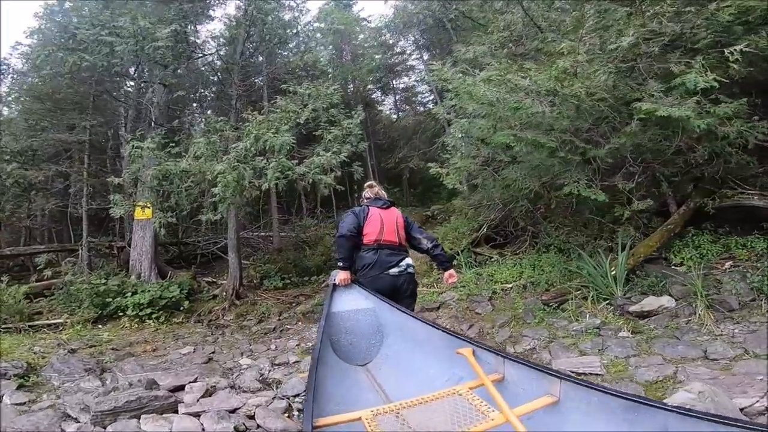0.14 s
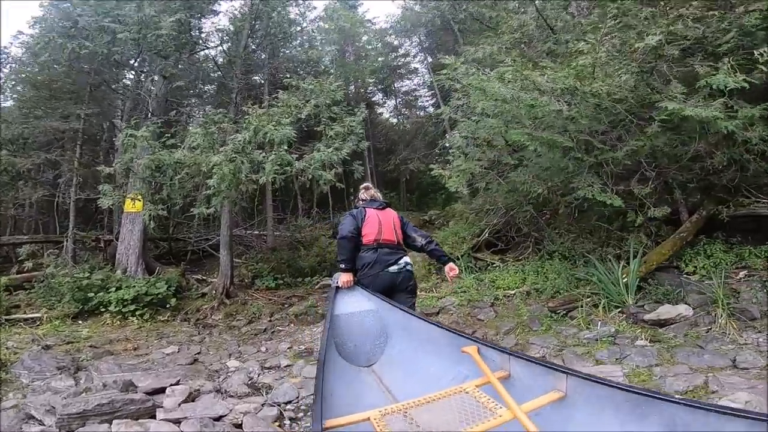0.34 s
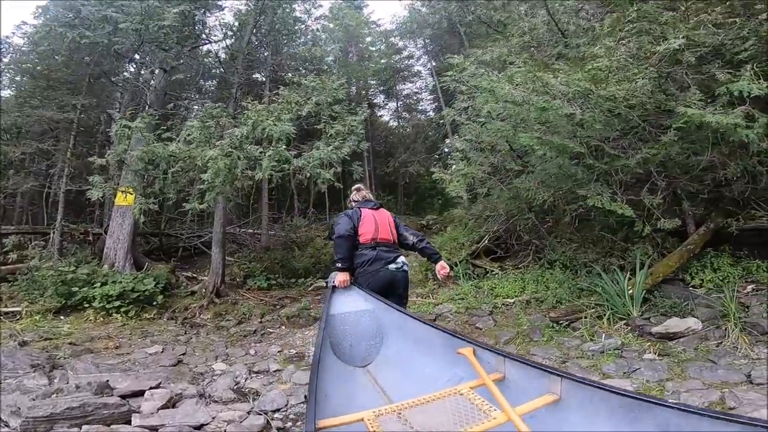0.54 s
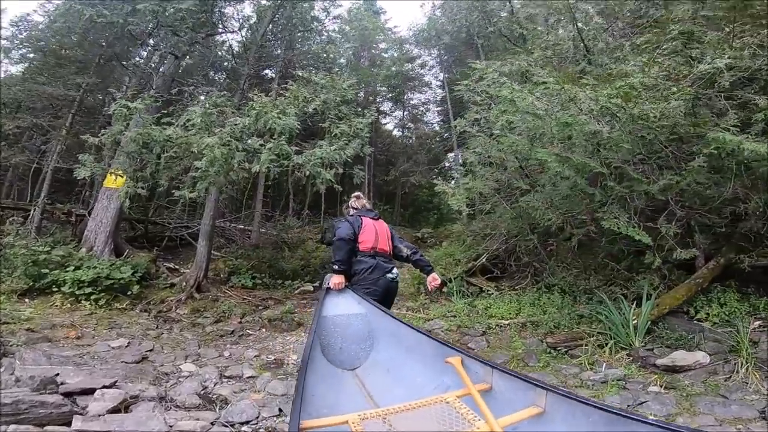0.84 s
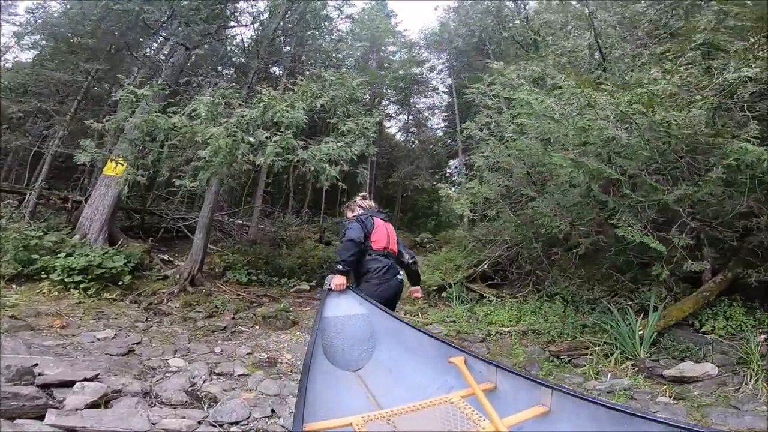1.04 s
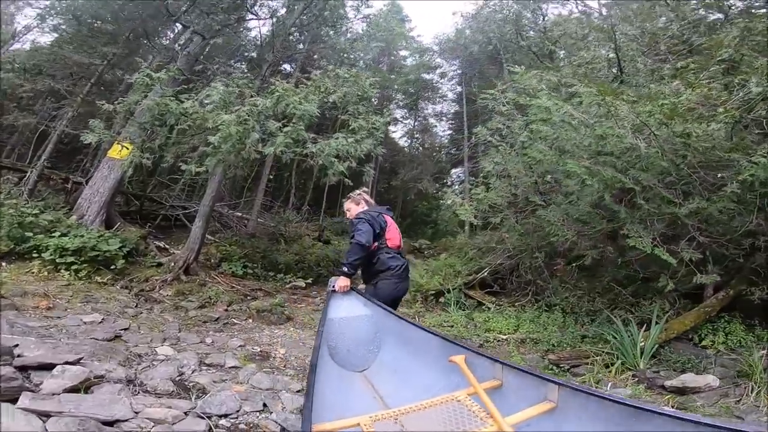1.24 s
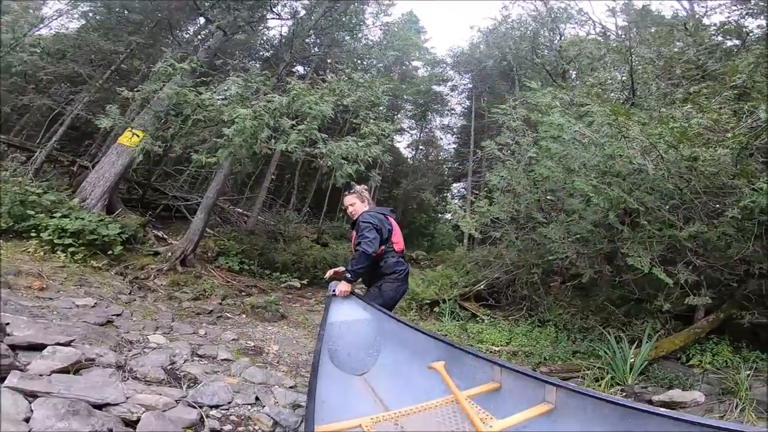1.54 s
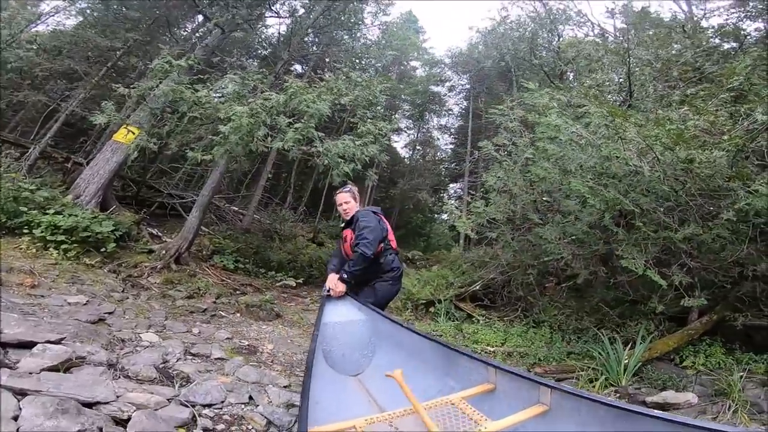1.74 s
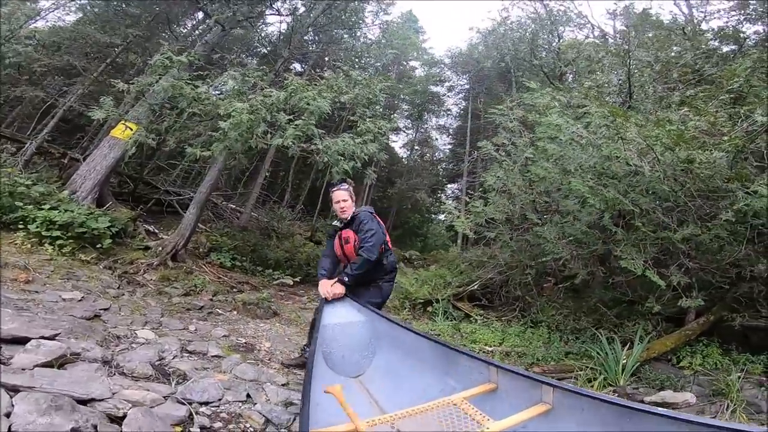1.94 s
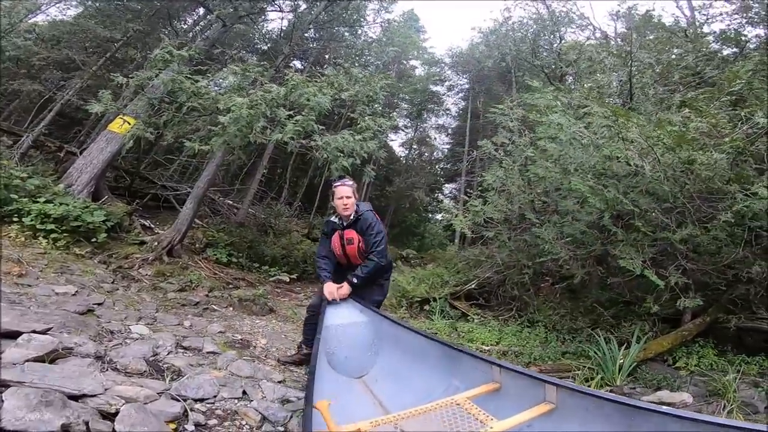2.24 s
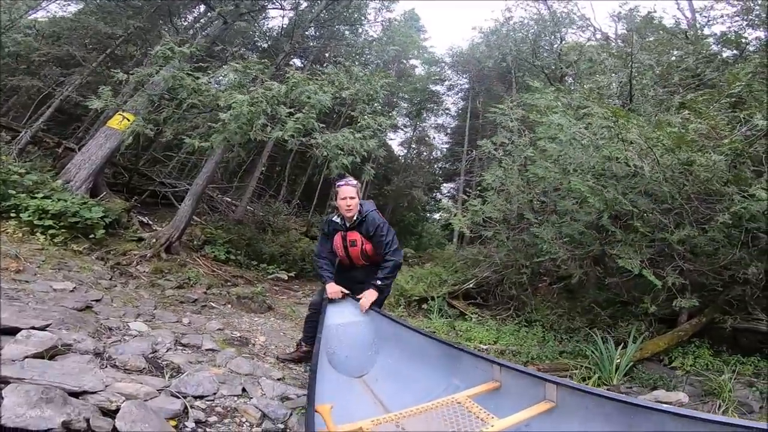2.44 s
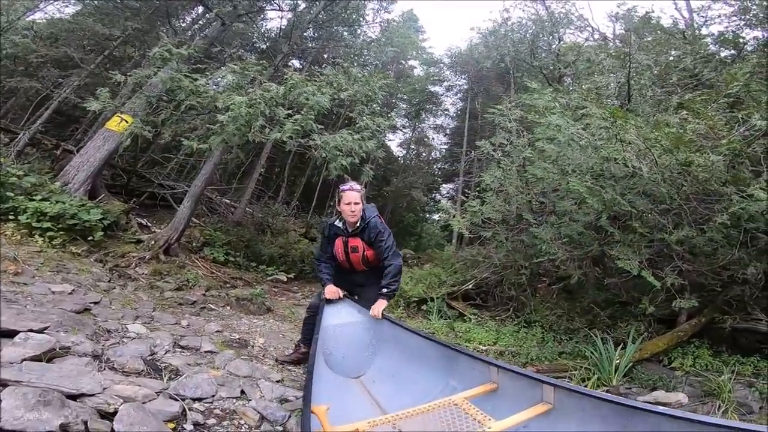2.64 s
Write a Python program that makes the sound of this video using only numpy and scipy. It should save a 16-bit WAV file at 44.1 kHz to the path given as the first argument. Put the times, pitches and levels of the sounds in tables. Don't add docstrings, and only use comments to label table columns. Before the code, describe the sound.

A canoe hull scrapes and knocks over stones as it is hauled up a rocky shore

```python
import sys
import numpy as np
from scipy import signal
from scipy.io import wavfile
from scipy.ndimage import uniform_filter1d

SR = 44100
rng = np.random.default_rng(int(sys.argv[2]) if len(sys.argv) > 2 else 0)


def gain_from_decibels(decibels):
    exponent = np.asarray(decibels, float) / 20
    return 10 ** exponent


def wav_out(sig):
    wavfile.write(sys.argv[1], SR, np.round(np.clip(np.atleast_2d(sig).T, -1, 1) * 32767).astype(np.int16))


N = 123479
T = np.arange(N) / SR

# start_s, rasp_db, weight_db (shaking the hull), fine_grit_db, keel_contact_db
PULL = [(0, -71.5, -51, 42, -4), (0.232, -44.5, -42, 17.5, 7), (0.25, -22, -33, 9.5, -14.5),
        (0.43, -25.5, -29, 9.5, 6.5), (0.596, -24.5, -27, 3, -1), (0.636, -29.5, -27, 8.5, -3),
        (0.901, -30.5, -34, 12.5, 2.5), (1.039, -36, -36, 14.5, 5), (1.099, -27, -35, 9.5, 4.5),
        (1.221, -31.5, -27.5, 10.5, 1), (1.451, -35, -23, 18.5, 1.5), (1.601, -40, -42, 22.5, 2.5),
        (1.702, -35, -30.5, 15.5, -0.5), (2.047, -37.5, -17.5, 20, -8.5), (2.3, -36, -28.5, 20, -14),
        (2.367, -33, -50, 25, -36), (2.429, -52.5, -19.5, 31, -10.5), (2.72, -65.5, -46.5, 32, -11.5)]
# pitch_hz, width_hz, level_db
HULL_PANELS = [(54.7, 8.2, -2), (95, 10.4, 3.5), (136, 35, 6), (170, 64, -2), (243.4, 35.7, 0.5),
               (291.5, 55, -7.5), (390, 29, -10)]
# pitch_hz, width_hz, level_db
KEEL_MODES = [(528, 14, -0.5), (663.6, 25.6, 12), (808, 68, 2.5), (917, 32, 5.5), (1011, 17, 0),
              (1100, 70, 4), (1700, 160, -2), (2490, 99, -15.5)]
# pitch_hz, level_db (per Hz)
RASP_COLOUR = [(180, -33), (300, 0), (590, -1.5), (821, -3.5), (1260, -9), (2690, -14), (4060, -31.5),
               (8130, -47.5), (15500, -65)]
# pitch_hz, level_db (per Hz)
SAND_COLOUR = [(2000, -11.5), (3000, 1), (4500, -11), (8200, -16), (10300, -20), (11500, -30.5),
               (14500, -37.5), (15500, -50)]
# start_s, length_s, level_db
KEEL_SURGES = [
    (.335, 0.091, 4.5),
    (.405, 0.045, 2.5),
    (.5, 0.09, 3.5),
]
# start_s, length_s, level_db
RINGING_DIPS = [
    (2.68, 0.27, -9),
    (1.04, 0.3, -3),
    (1.341, 0.035, -14),
    (2.068, 0.019, -9),
    (2.217, 0.032, -13.5),
]
# start_s, level_db, pitch_hz, length_s
RIB_RINGS = [(0, -44.5, 185, 0.094), (.545, -25.5, 860, 0.052), (.51, -29.5, 525, 0.068),
             (1.11, -39, 1060, 0.051), (1.135, -32, 920, 0.062), (1.195, -34, 970, 0.033),
             (1.229, -39, 850, .012), (1.365, -20.5, 670, .012), (1.366, -22.5, 349, 0.026),
             (2.1, -35, 700, 0.04), (2.1, -27, 378, 0.062), (2.345, -49, 2680, .07),
             (2.63, -63, 2660, 0.11)]
# pitch_hz, level_db (per Hz)
WASH_COLOUR = [(15, -7.5), (45, 1), (110, -15), (200, -16), (350, -33.5), (1600, -39.5), (5500, -60),
               (12000, -92)]
# start_s, length_s, level_db
WASH_GUST = [
    (.4, .6, 8),
]
# start_s, level_db, from_hz, to_hz, length_s
DROPLETS = [
    (2.596, -57, 950, 1550, .017),
    (2.602, -54, 2300, 2350, .011),
    (2.643, -52, 900, 2100, .036),
    (.085, -43, 430, 400, .04),
    (1.08, -40, 1950, 1950, .045),
    (1.335, -49, 3300, 3250, .05),
    (1.2445, -28, 980, 1000, .01),
    (1.096, -29, 900, 930, .016),
]
# start_s, level_db, pitch_hz, t60_s
HULL_KNOCKS = [(0.13, -20, 220.3, 0.21), (0.166, -14, 189, 0.094), (0.283, -22, 156.7, 0.26),
               (.29, -20.5, 250, 0.17), (0.321, -22.5, 140.5, 0.47), (.33, -20, 243, 0.2),
               (0.412, -10.5, 177.3, 0.12), (.42, -27, 266, 0.16), (0.601, -16, 113, 0.39),
               (0.637, -28, 110, 0.23), (0.777, -21.5, 124, 0.26), (0.821, -22, 170, 0.72),
               (0.943, -23, 233.2, 0.55), (0.969, -23, 390, 0.26), (1.021, -29.5, 245, 0.39),
               (1.246, -19, 226.6, 0.25), (1.279, -17.5, 142.6, 0.24), (1.299, -15.5, 141.3, .35),
               (1.37, -9.5, 124, 0.12), (1.369, -11, 257.9, 0.28), (1.393, -26, 254.8, 0.35),
               (1.425, -18, 147, 0.2), (1.439, -16, 90.6, 0.23), (1.531, -29, 119, 0.33),
               (1.715, -29.5, 301, 0.15), (1.786, -26.5, 260, 0.45), (1.94, -19, 134, 0.15),
               (2.027, -20, 89, 0.33), (2.096, -7.5, 97.9, 0.31), (2.093, -16, 279, 0.17),
               (2.149, -10, 96, 0.2), (2.176, -22.5, 95.3, 0.34), (2.195, -14.5, 96.9, 0.28),
               (2.269, -25, 96, 0.32), (2.351, -18, 100, 0.32), (2.391, -20, 95, 0.2),
               (2.456, -12.5, 78.3, 0.17), (2.489, -15, 97.9, 0.21), (2.581, -22.5, 101, 0.2)]
# start_s, level_db, pitch_hz (stone ring), t60_s,
# grit_db
STONE_SCUFFS = [(0.133, -25.5, 1170, 0.081, -35), (0.422, -20.5, 1310, 0.2, -40),
                (0.684, -23, 1550, 0.063, -33), (0.79, -21, 2320, 0.19, -28),
                (0.951, -18.5, 1560, 0.091, -19.5), (1.134, -27, 1200, 0.24, -38),
                (1.188, -28.5, 1240, 0.17, -47), (1.277, -21, 1620, 0.16, -46),
                (1.357, -23.5, 3200, 0.16, -14), (1.367, -17, 1450, 0.072, -29),
                (1.422, -26.5, 1460, 0.14, -21), (1.445, -30.5, 1180, 0.128, -21),
                (1.519, -27, 1660, 0.068, -18.5), (1.553, -37, 2060, 0.032, -10),
                (1.609, -31.5, 2010, 0.13, -31), (1.783, -28.5, 1350, 0.15, -31),
                (1.865, -28.5, 1650, 0.18, -38), (1.934, -34.5, 1490, 0.14, -14.5),
                (2.08, -20, 2930, 0.0922, -37),
    (2.086, -12.5, 2194, 0.0988, -36),
    (2.098, -22.5, 1990, 0.08, -10),
    (2.122, -27, 1430, 0.23, -34),
    (2.325, -33, 1410, 0.16, -42),
    (2.349, -38, 1700, 0.18, -24),
    (2.431, -44, 1250, 0.056, -19),
    (2.449, -25, 1230, 0.11, -27),
    (2.502, -38, 1240, 0.16, -19),
]
# start_s, level_db, pitch_hz, length_s
GRIT_TICKS = [(.262, -51, 5300, 0.015), (.25, -62, 13000, 0.0716), (.34, -65, 13000, 0.12),
              (.785, -51.5, 4800, 0.032), (1.015, -63, 5800, 0.02), (1.08, -60.5, 7300, 0.0099),
              (1.135, -60, 6400, 0.0049), (1.183, -45, 3230, .02), (1.356, -44, 5040, 0.0059),
              (1.368, -64, 7600, 0.0085), (1.381, -53, 8000, 0.0047), (1.442, -63, 5400, 0.0061),
              (1.475, -60, 8000, 0.014), (1.57, -57, 7500, 0.0091), (1.606, -61, 7600, 0.034),
              (1.636, -59, 7700, 0.023), (1.658, -57, 7400, 0.03), (1.678, -62, 8700, 0.024),
              (1.697, -64, 8100, 0.024), (1.835, -61, 8800, 0.0075), (1.888, -59, 8500, 0.013),
              (2.085, -49, 7250, 0.0073), (2.099, -47, 7000, .007), (2.12, -49, 5900, .01),
              (2.14, -55, 5800, 0.013), (2.16, -58, 6100, .014), (2.21, -57.5, 5000, 0.032),
              (2.225, -62.5, 7500, .035), (2.297, -71, 6000, 0.0056), (2.32, -54, 4700, .012),
              (2.35, -51.5, 4800, 0.023), (2.575, -64.5, 5640, .006)]


def evened(x):
    return x / np.sqrt(np.mean(x ** 2) + 1e-20)


def colour(x, points):
    f, db = np.transpose(points)
    hz = abs(np.fft.fftfreq(8192, 1 / SR))
    curve_db = np.interp(np.log(hz + 1), np.log(f + 1), db)
    log_gain = np.log(gain_from_decibels(np.maximum(curve_db, -100)))
    taps = np.fft.ifft(np.exp(np.conj(signal.hilbert(log_gain)))).real[:4096]
    return signal.oaconvolve(x, taps / np.linalg.norm(taps))[:len(x)]


def resonate(x, hz, width):
    turn = np.exp(2j * np.pi * hz * np.arange(len(x)) / SR)
    r = np.exp(-np.pi * width / SR)
    return 2 * (turn * signal.lfilter([1 - r], [1, -r], x / turn)).real


def body(x, modes, count=1):
    out = 0
    for k, (hz, width, db) in enumerate(modes):
        y = x
        for _ in range(count):
            y = resonate(y, hz, width)
        out = out + (-1) ** k * gain_from_decibels(db) * y / np.sqrt(width)
    return out


def wander(seconds):
    size = max(int(seconds * SR), 1)
    smooth = uniform_filter1d(rng.standard_normal(N), size)
    return evened(uniform_filter1d(smooth, size))


def slips(per_s, spread_db):
    draw, size, sign = rng.random(N), rng.exponential(1, N), rng.standard_normal(N)
    caught = draw < per_s / SR
    return evened(caught * gain_from_decibels(spread_db * np.minimum(size, 4)) * sign)


def swells(rows):
    return gain_from_decibels(sum(db * np.sin(np.pi * np.clip((T - s) / length, 0, 1)) for s, length, db in rows))


def add(mix, s, sound):
    part = mix[round(s * SR):][:len(sound)]
    part += sound[:len(part)]


def grains(rows, sharpness):
    out = np.zeros(N)
    for (s, db, hz, length), n in zip(rows, rng.standard_normal((len(rows), 5000))):
        u = np.minimum(np.arange(5000) / SR / length, 1)
        ring = evened(body(n, [(hz, hz / sharpness, 0)], count=2))
        add(out, s, gain_from_decibels(db) * np.sin(np.pi * u ** 0.56) * ring)
    return out


def chatter(level):
    per_s, spread_db, cycles, tilt_db_per_octave = 40, 0.78, 25, -6.5
    out, t = np.zeros(N), np.arange(2000) / SR
    for hz in np.geomspace(695, 3848, 30):
        u = t * hz / cycles
        tilt = gain_from_decibels(tilt_db_per_octave * np.log2(hz / 1000))
        grain = tilt * u * np.exp(-3.5 * u) * np.sin(2 * np.pi * hz * t)
        out += signal.oaconvolve(level * slips(per_s, spread_db), grain)[:N]
    return out * np.std(level) / np.std(out)


def drag():
    slips_per_s, sand_per_s, judder_per_s = 3000, 11000, 250
    grit_gain_db, keel_gain_db, sand_gain_db, chatter_gain_db = -8, -3.5, -31.5, -5.5
    s, *courses = np.transpose(PULL)
    rasp_db, weight_db, fine_db, keel_db = [np.interp(T, s, course) for course in courses]
    level = gain_from_decibels(rasp_db) * swells(KEEL_SURGES)
    clumps = gain_from_decibels(1.16 * wander(0.018) + 1.0 * wander(0.053))
    grit = clumps * slips(slips_per_s, 1.5) * level
    unit = rng.standard_normal(N)

    keel = body(grit * gain_from_decibels(keel_gain_db + keel_db), KEEL_MODES, count=2)
    keel = keel / np.std(body(unit, KEEL_MODES, count=2))
    sand_gain = gain_from_decibels(sand_gain_db + 1.0 * wander(0.0036) + fine_db)
    sand = colour(slips(sand_per_s, 1.2) * level * sand_gain, SAND_COLOUR)

    judder = slips(judder_per_s, 1.1) * gain_from_decibels(weight_db + 0.61 * wander(0.014))
    upper = judder * gain_from_decibels(1.28 * keel_db)
    panels = body(judder, HULL_PANELS[:2], count=2) + body(upper, HULL_PANELS[2:], count=2)
    panels = panels / np.std(body(unit, HULL_PANELS, count=2))

    rasp = gain_from_decibels(grit_gain_db) * (colour(grit, RASP_COLOUR) + keel + sand)
    return rasp + gain_from_decibels(chatter_gain_db) * chatter(level) + swells(RINGING_DIPS) * panels


def ribs():
    return grains(RIB_RINGS, 7.6)


def wash():
    level_db, fade_db, gust_db = -43.5, -12, 0.6
    course_db = level_db + fade_db * (T / T[-1] - .5) + gust_db * wander(0.15)
    noise = evened(colour(rng.standard_normal(N), WASH_COLOUR))
    return swells(WASH_GUST) * gain_from_decibels(course_db) * noise


def drops():
    splash_s, splash_length_s, splash_db = 2.635, .08, -63
    out = np.zeros(N)
    for s, db, from_hz, to_hz, length in DROPLETS:
        u = np.linspace(0, 1, int(length * SR))
        phase = 2 * np.pi * np.cumsum(from_hz + (to_hz - from_hz) * u) / SR
        add(out, s, gain_from_decibels(db + 4.5) * np.sin(np.pi * u) * np.sin(phase))
    spray = colour(rng.standard_normal(SR // 5), SAND_COLOUR)[:int(splash_length_s * SR)]
    add(out, splash_s, gain_from_decibels(splash_db) * np.hanning(len(spray)) * spray)
    return out * gain_from_decibels(3.5 * wander(.0015))


def knocks():
    sag, sag_s, swell_s, blow_cycles = 0.11, 0.016, 0.0048, 0.42
    overtone_ratio, overtone_db, panels_db = 2.3, -12.5, -8
    out, blows = np.zeros(N), np.zeros(N)
    t, wobble = np.arange(SR // 2) / SR, 0.5 * wander(0.011)
    for s, db, hz, t60 in HULL_KNOCKS:
        sagging = t + sag * sag_s * (1 - np.exp(-t / sag_s))
        phase = 2 * np.pi * hz * sagging + hz / 200 * np.roll(wobble, -int(s * SR))[:len(t)]
        overtone = gain_from_decibels(overtone_db - 60 * t / t60) * np.sin(overtone_ratio * phase)
        envelope = gain_from_decibels(db - 60 * t / t60) * (1 - np.exp(-t / swell_s))
        add(out, s, envelope * (np.sin(phase) + overtone))
        push = np.hanning(int(blow_cycles * SR / hz))
        add(blows, s, gain_from_decibels(db) * push / push.sum())
    click = 1. * (T == 0)
    stirred = body(blows, HULL_PANELS) / abs(body(click, HULL_PANELS)).max()
    return swells(RINGING_DIPS) * (out + gain_from_decibels(panels_db) * stirred)


def scuffs():
    stone_width_hz, stone_db, grit_gain_db, grit_haste = 300, -10.5, 7, 0.65
    rows, t, out = STONE_SCUFFS, np.arange(6000) / SR, np.zeros(N)
    shape = (len(rows), len(t))
    noise = rng.standard_normal(shape) * gain_from_decibels(2.26 * rng.standard_normal(shape))
    for (s, db, hz, t60, grit_db), n in zip(rows, noise):
        rise = .09 * t60
        decay = gain_from_decibels(db - 6 - 60 * np.maximum(t - rise, 0) / t60)
        burst = evened(n) * np.minimum(t / rise, 1) ** 2 * decay
        ring = body(burst, [(hz, stone_width_hz, 0)], count=2) * np.sqrt(SR / np.pi)
        grit = colour(burst * gain_from_decibels(-60 * grit_haste * t / t60), SAND_COLOUR)
        sound = colour(burst, RASP_COLOUR) + gain_from_decibels(stone_db) * ring + gain_from_decibels(grit_gain_db + grit_db) * grit
        add(out, s - rise / 2, sound)
    return out


def ticks():
    return grains(GRIT_TICKS, 2.6)


def scene():
    return (drag() + ribs() + wash() + drops() + knocks() + scuffs() + ticks())[None]


def top_cut(x):
    return signal.sosfilt(signal.butter(12, 15610, fs=SR, output="sos"), x)


def record(dry):
    dull = signal.sosfilt(signal.butter(2, 9900, fs=SR, output="sos"), dry)
    return top_cut(dull)


dry = scene()
out = record(dry)
wav_out(out)
```